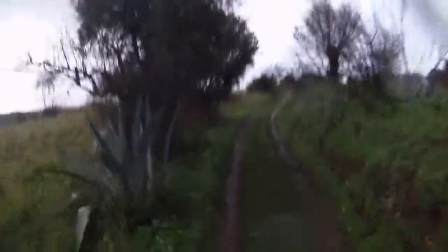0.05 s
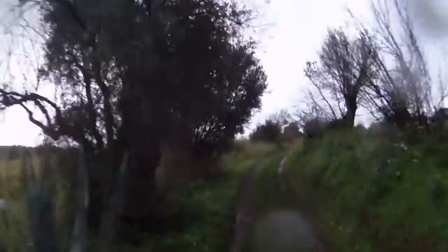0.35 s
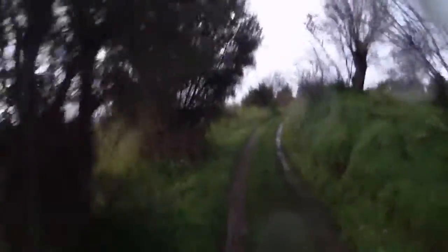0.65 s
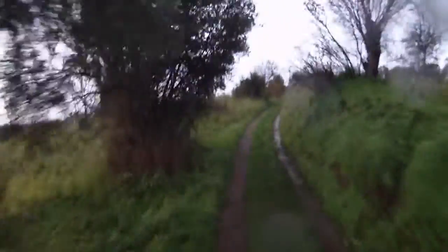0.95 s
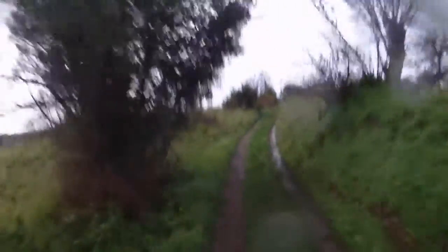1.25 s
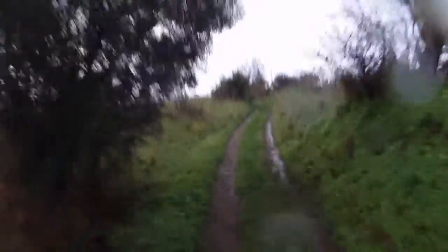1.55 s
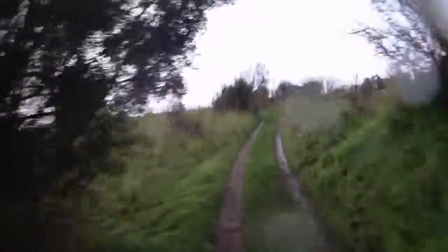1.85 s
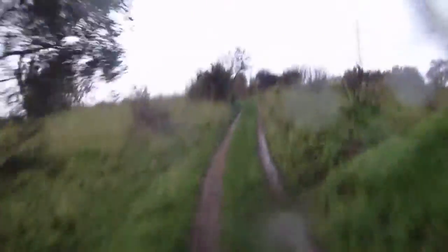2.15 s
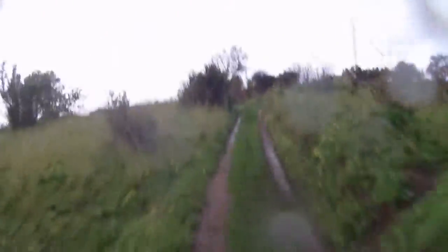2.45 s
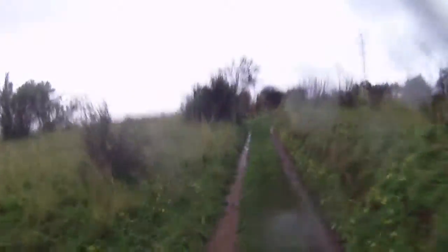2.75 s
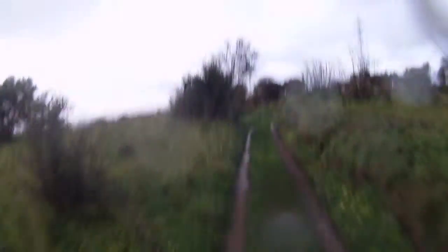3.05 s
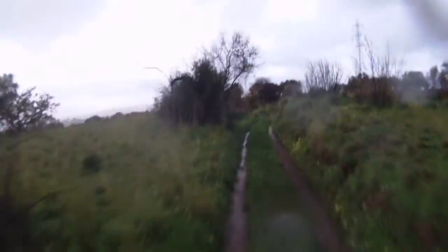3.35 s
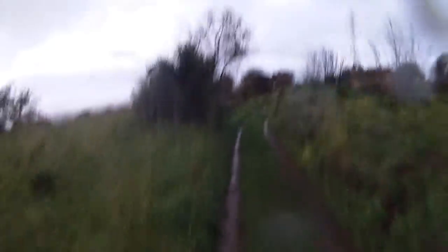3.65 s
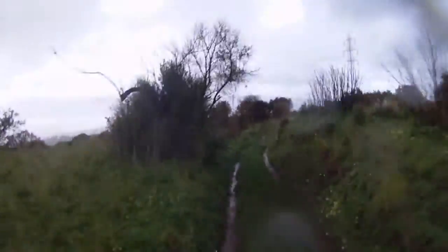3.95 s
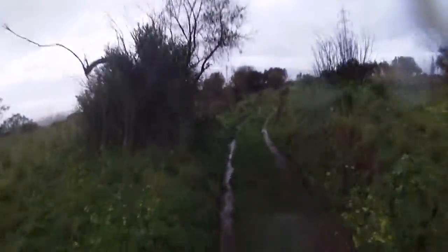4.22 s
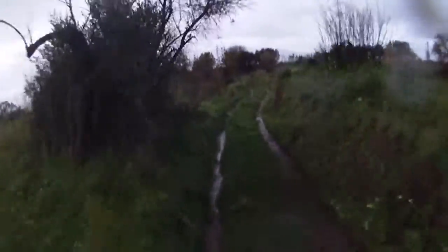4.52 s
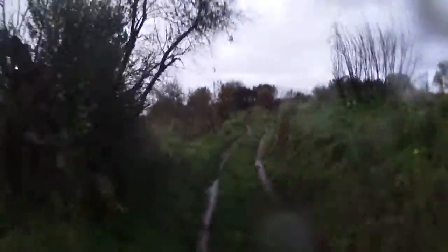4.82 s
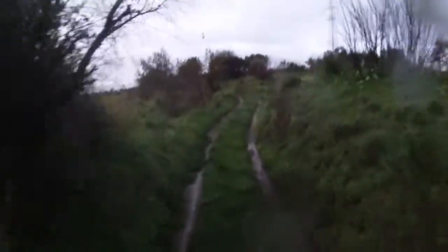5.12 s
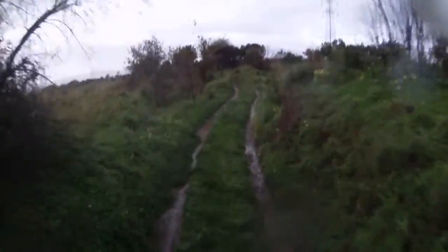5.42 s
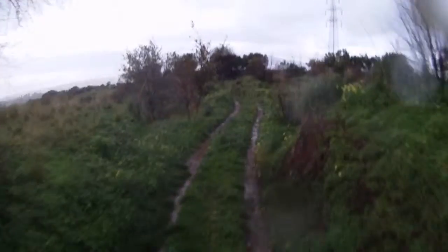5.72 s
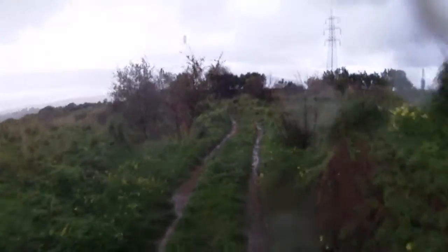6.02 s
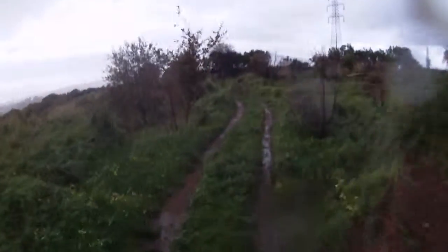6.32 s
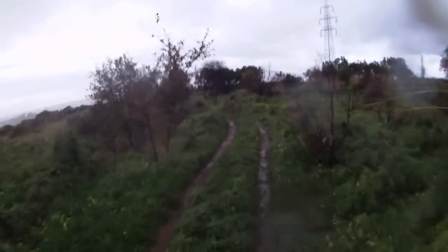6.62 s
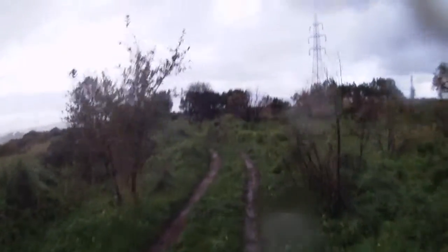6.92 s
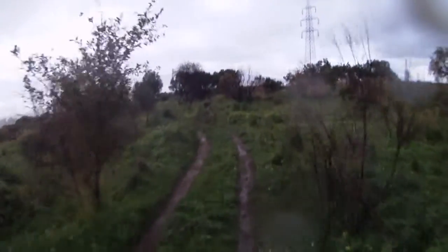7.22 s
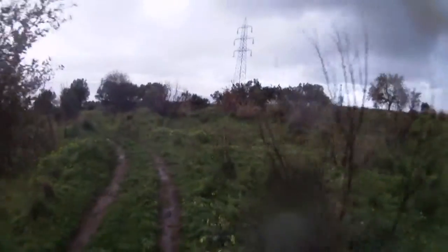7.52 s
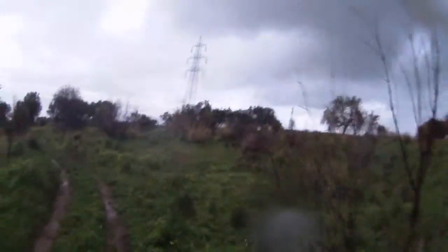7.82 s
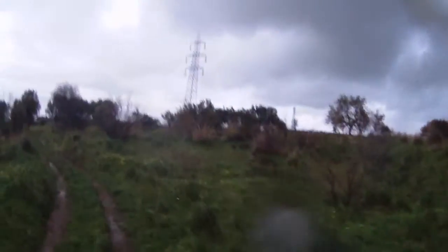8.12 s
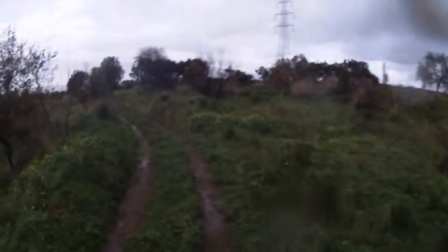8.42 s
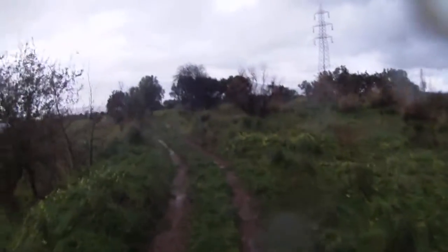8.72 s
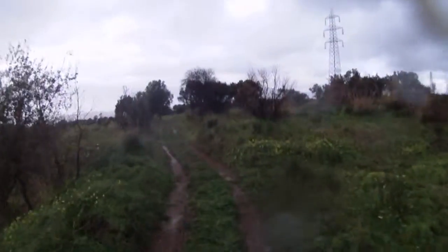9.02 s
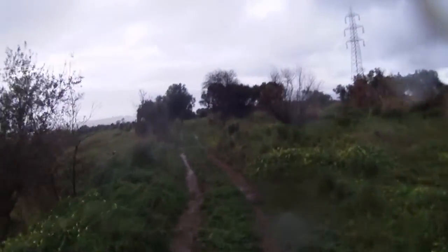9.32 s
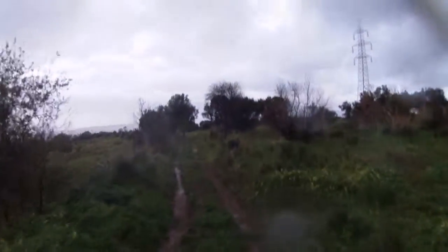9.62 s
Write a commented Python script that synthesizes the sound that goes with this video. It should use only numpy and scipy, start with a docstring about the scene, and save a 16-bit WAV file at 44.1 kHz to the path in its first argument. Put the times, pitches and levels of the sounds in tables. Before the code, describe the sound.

A bumpy outdoor ride on a wet track, heard from inside a closed plastic camera case. It opens with boxy, gusting wind and a loud clatter, over gritty tyre noise, a thin hiss of spray and light rain ticks. The wind falls away a little before halfway, while the tyres keep crackling more softly and the case goes on knocking, rattling and thumping on its mount.

```python
"""A hollow roar of wind comes first, with crunching grit and a few sharp knocks close behind.
A camera in a closed plastic case is riding up a wet dirt track. Wind stirs the air inside the case
and drops after four seconds; tyre grit and small rattles make its shell ring.
Bumps thump through the camera's mount, the case knocks, clatters and gives a few low, soft pops,
fine spray hisses, and raindrops tick on the case."""
import sys
import numpy as np
from scipy import signal
from scipy.fft import rfft, irfft
from scipy.io import wavfile
from scipy.ndimage import uniform_filter1d

SR = 44100
rng = np.random.default_rng(int(sys.argv[2]) if len(sys.argv) > 2 else 0)


def to_wav(sig):
    """Store sig (one row per channel, or 1-D mono) as 16-bit WAV at the path in sys.argv[1].

    Samples outside -1..1 are clipped; the rate is SR.
    """
    pcm = np.clip(np.atleast_2d(sig), -1, 1) * 32767
    pcm = np.round(pcm).astype(np.int16)
    wavfile.write(sys.argv[1], SR, pcm.T)  # frames by channels


N = 434826
HIT = 8192  # samples set aside for one short sound


def undb(db):
    """Turn decibels into a number to multiply by."""
    return 10 ** (np.asarray(db) / 20)


def unit(x):
    """Scale a signal so its average strength (rms) is 1."""
    return x / np.sqrt(np.mean(x ** 2))


def peak(x, db):
    """Scale a signal so its highest peak is at db."""
    return x * undb(db) / np.abs(x).max()


def add(out, s, x):
    """Mix x into out, starting at s seconds."""
    start = int(np.clip(s * SR, 0, N - 1))
    out[start:start + len(x)] += x[:N - start]


def curves(table):
    """Join a table's points in time with straight lines, one curve for each level column."""
    times, *columns = np.transpose(table)
    return [np.interp(np.arange(N) / SR, times, column) for column in columns]


def colour(x, tone):
    """Pass x through an object whose tone is given as rows of f/Hz, level/dB."""
    hz, db = np.transpose(sorted(tone))
    grid_hz = np.maximum(np.arange(HIT // 2 + 1) * SR / HIT, 1)
    gain = undb(np.interp(np.log(grid_hz), np.log(hz), db))
    # put all the ringing after each hit, so its start stays sharp
    cepstrum = irfft(np.log(gain))
    cepstrum[1:HIT // 2] *= 2
    cepstrum[HIT // 2 + 1:] = 0
    ring = irfft(np.exp(rfft(cepstrum)))
    return signal.fftconvolve(x, ring)[:len(x)]


def resonate(x, hz, q):
    """Make x ring at one pitch, using two filters in a row; a higher q rings longer."""
    once = signal.lfilter(*signal.iirpeak(hz, q, fs=SR), x)
    return signal.lfilter(*signal.iirpeak(hz, q / 2, fs=SR), once)


def wander(per_s):
    """A smooth random wobble of strength 1 that picks a new value per_s times a second."""
    hold = int(SR / per_s)
    steps = np.repeat(rng.standard_normal(N // hold + 1), hold)
    return unit(uniform_filter1d(uniform_filter1d(steps, hold), hold // 2)[:N])


def impacts(per_s, spread_db):
    """Taps at random times, most small and a few large."""
    size_db = spread_db * np.minimum(rng.exponential(size=N), 4)
    return (rng.random(N) < per_s / SR) * undb(size_db)


def crackle(per_s, spread_db, decay_s):
    """A loudness curve that jumps at each random tap and then dies away."""
    return unit(signal.lfilter([1], [1, -np.exp(-1 / (decay_s * SR))], impacts(per_s, spread_db)))


def contact(decay_s):
    """One brief, rough touch: a burst of noise that fades."""
    return rng.standard_normal(HIT) * np.exp(-np.arange(HIT) / SR / decay_s)


# How rough and wet the track is: t/s, grit level/dB, spray level/dB
TRACK = [(0, -25, -45), (.45, -25, -40.5), (.68, -27.5, -44), (1.02, -29.5, -50), (1.26, -27, -45.5),
         (1.8, -25.5, -51), (2.25, -29.5, -47.5), (2.52, -32.5, -53), (3.15, -27.5, -53),
         (3.33, -30, -52.5), (3.6, -26.5, -48.5), (4.3, -33.5, -47.5), (4.7, -32, -53.5),
         (5.03, -29.5, -44), (5.22, -36, -53.5), (5.5, -36, -51.5), (5.8, -30, -48), (6.2, -35.5, -51.5),
         (6.8, -35, -55.5), (7.1, -33, -50), (7.9, -36.5, -53.5), (9.15, -32.5, -56.5), (9.34, -41.5, -59),
         (9.58, -31, -54), (9.86, -38, -53)]
def track(patch_db=1.0, patches_per_s=20, halving_s=0.024):
    """Grit and spray levels waver over patches and swell around each bump, knock, pop and clatter."""
    grit_db, hiss_db = curves(TRACK) + patch_db * wander(patches_per_s)
    events = np.zeros(N)
    for s, *_ in TRACK_BUMPS + KNOCKS_AND_POPS + CLATTER_BURSTS:
        add(events, s, np.ones(1))
    swell = signal.windows.hann(2 * int(2 * halving_s * SR) + 1)
    stir = np.clip(signal.fftconvolve(events, swell, "same"), 0, 1)
    return grit_db + 1.5 * stir, hiss_db + 0.36 * stir


# The tone of fine water on the case: f/Hz, level/dB
SPRAY_TONE = [(4000, -40), (8000, -28), (10800, -13), (12300, 3), (12900, 5.5), (13800, 1.5), (14800, 5),
              (15700, -4.5)]
def spray(hiss_db, flicker_db=1.1, boost_db=1):
    """Fine water hisses and spatters over the case."""
    mist = rng.standard_normal(N) * undb(flicker_db * wander(22))
    spatter = 1 + 0.52 * crackle(per_s=45, spread_db=2.7, decay_s=0.0033)
    return unit(colour(mist * spatter, SPRAY_TONE)) * undb(hiss_db + boost_db)


# The biggest raindrops: t/s, peak level/dB before the boost, ring f/Hz
RAINDROPS = [(0.228, -25, 13700), (0.7503, -32, 4300), (0.813, -20, 4900), (1.248, -25, 12500),
             (1.41, -32, 6840), (1.745, -34, 4960), (2.289, -27, 14800), (2.943, -22, 14000),
             (3.5285, -24, 14000), (3.675, -27, 12600), (3.74, -36, 6250), (4.1496, -26, 13300),
             (4.462, -30, 12900), (4.521, -26, 13100), (4.705, -28, 13300), (4.979, -31, 12300),
             (6.151, -32, 4830), (8.199, -30, 14900)]
def raindrops(splash_s=0.00096, boost_db=1):
    """Raindrops tick on the case, each with its own short ring."""
    out = np.zeros(N)
    for s, db, hz in RAINDROPS:
        add(out, s, peak(resonate(contact(splash_s), hz, q=7), db + boost_db))
    return out


def ticks(grit_db, offset_db=-15):
    """Small parts tick against the shell at random, harder on rough ground."""
    taps = impacts(per_s=9, spread_db=5.0)
    return unit(colour(taps, SHELL_TONE)) * undb(grit_db + offset_db)


# The deep tone of the swaying mount: f/Hz, level/dB
SWAY_TONE = [(12, -31), (22, -1.0), (50, -0.5), (70, -11.5), (110, -13.0), (200, -20.5), (400, -47)]
def rocking(grit_db, sway_db=4.0, rise_s=0.017, fall_s=0.11):
    """The mount rumbles on rough ground and keeps swaying after every bump."""
    t = np.arange(N) / SR
    power = undb(-50 + 0.34 * grit_db) ** 2
    for s, _, _, rock_db in TRACK_BUMPS:
        age = np.maximum(t - s, 0)
        power += (undb(rock_db) * (1 - np.exp(-age / rise_s)) * np.exp(-age / fall_s)) ** 2
    sway = rng.standard_normal(N) * undb(sway_db * wander(14))
    return unit(colour(sway, SWAY_TONE)) * np.sqrt(power)


# The low notes the mount rings at: f/Hz, fade time/s (to fall by 60 dB), level/dB
MOUNT_NOTES = [(51, 0.21, -21), (84.4, 0.056, -10.5), (125, 0.038, -11.5), (176, 0.032, -13),
               (234.6, 0.075, -5), (273, 0.051, -12.5), (406, 0.035, 1)]
# The tone of the shuddering case: f/Hz, level/dB
SHUDDER_TONE = [(100, -19), (400, -14), (800, 6.5), (1400, -3.5), (2800, -1.5), (3800, -51), (9000, -39)]
# Bumps, before the boosts: t/s, thump level/dB, shudder level/dB, rocking level/dB
TRACK_BUMPS = [(0.013, -31, -21, -38), (0.283, -33, -36, -48), (0.388, -30, -9.5, -42),
               (0.415, -29.5, -9.5, -47), (0.468, -25.5, -25, -55), (0.758, -34.5, -20, -59),
               (1.338, -35, -23.5, -48), (1.468, -30.5, -19, -49), (1.8, -39, -23, -50),
               (1.985, -36.5, -25, -43), (2.155, -31.5, -33, -49), (2.325, -48, -18, -50),
               (2.833, -28.5, -36, -61), (3.506, -36.5, -38, -45), (3.856, -35.5, -28, -47),
               (3.969, -47, -16.5, -41), (4.075, -36.5, -24, -58), (4.271, -27.5, -21, -43),
               (4.392, -32.5, -25.5, -56), (4.587, -37.5, -41, -58), (4.767, -28, -22, -49),
               (5.25, -36.5, -30, -62), (6.126, -42, -37, -64), (6.398, -41, -30, -56),
               (6.57, -44, -40, -53), (6.652, -41, -34.5, -55), (6.895, -32, -19.5, -55),
               (7.036, -41, -48, -58), (8.816, -31, -24.5, -61), (9.111, -32, -29, -59),
               (9.572, -48, -25, -52)]
def bumps(push_s=0.0028, shudder_s=0.011, thump_delay_s=0.00307, thump_boost_db=3.5, shudder_boost_db=7):
    """Each bump thumps the mount into ringing at its low notes, and the case shudders on it."""
    out, t = np.zeros(N), np.arange(HIT) / SR
    push = 1 - np.exp(-t / push_s)
    for s, thump_db, shudder_db, _ in TRACK_BUMPS:
        ring = np.zeros(HIT)
        for hz, fade_s, note_db in MOUNT_NOTES:
            detuned_hz = hz * (1 + 0.034 * rng.standard_normal())
            phase = 2 * np.pi * (detuned_hz * t + rng.random())
            ring += np.sin(phase) * undb(note_db - 60 * t / fade_s)
        add(out, s + thump_delay_s, peak(ring * push, thump_db + thump_boost_db))
        shudder = colour(contact(shudder_s), SHUDDER_TONE)
        add(out, s, peak(shudder, shudder_db + shudder_boost_db))
    return out


# The tone of the plastic shell: f/Hz, level/dB
SHELL_TONE = [(120, -36), (240, -16.5), (300, -18), (520, -12), (750, -4), (1000, -5), (1500, -6),
              (1950, -3.5), (2350, -4), (2620, 2), (2760, 8.5), (2930, 1), (3100, -5.5), (3900, -27.5),
              (5500, -70), (9000, -100)]
# The shell's high, bright ringing: f/Hz, level/dB
TREBLE_TONE = [(3000, -25), (4100, -8), (4550, -8), (4940, 5), (5270, -1), (5570, 2.5), (5920, -9.5),
               (6300, -1), (6650, -7), (7100, -4.5), (7800, -6.5), (8600, -12.5), (10800, -12.5),
               (16000, -10)]
def tyres(grit_db, hiss_db, shake_db=0.56, grains_db=-1, rattle_db=-1.5):
    """Wet grit crackles under the tyres and shakes small parts into rattling; both ring the shell."""
    shake = undb(shake_db * wander(40))
    rattles = crackle(per_s=80, spread_db=2.5, decay_s=0.0045)
    grains = unit(impacts(per_s=900, spread_db=3.8) * rng.standard_normal(N))
    rattling = (1.1 + undb(rattle_db) * rattles) * rng.standard_normal(N)
    crunch = shake * (undb(grains_db) * grains + rattling)
    fizz = shake * (rng.standard_normal(N) * (1 + 0.55 * rattles) + 0.19 * grains)
    # the bright ringing follows grit and spray about equally
    gap_db = grit_db - hiss_db
    treble_db = hiss_db - 3 + 0.48 * (gap_db - np.mean(gap_db))
    body = unit(colour(crunch, SHELL_TONE)) * undb(grit_db)
    return body + unit(colour(fizz, TREBLE_TONE)) * undb(treble_db)


# Bursts of clatter: t/s, level/dB, length/s, ring f/Hz, treble level/dB before the splash is added
CLATTER_BURSTS = [(0.415, -1, 0.0043, 2450, -16.5), (0.432, -11, .012, 2640, -29),
                  (0.442, -24, 0.011, 2550, -31), (0.501, -30, 0.0087, 2680, -37),
                  (2.18, -28, .005, 2500, -36), (3.168, -13, 0.0037, 2800, -46),
                  (3.962, -25, 0.04, 2420, -47), (4.698, -30, 0.059, 2540, -51),
                  (5.075, -22, 0.0076, 2700, -56), (5.57, -30, 0.015, 2750, -50),
                  (6.903, -29, 0.016, 2720, -62), (7.422, -30, 0.022, 2600, -60),
                  (8.193, -33, .01, 2740, -59), (9.123, -31, 0.012, 2670, -57),
                  (9.573, -28, 0.017, 1600, -55)]
def clatters(splash_db=-2):
    """Hard jolts make the case chatter against its mount and shake water off it."""
    out = np.zeros(N)
    for s, db, length_s, hz, treble_db in CLATTER_BURSTS:
        gate = np.exp(-(2 * np.arange(HIT) / SR / length_s - 1) ** 6)  # on, then off, with soft edges
        chatter = rng.standard_normal(HIT) * gate
        ring = unit(resonate(colour(chatter, SHELL_TONE), hz, q=4))
        splash = undb(splash_db) * unit(colour(chatter, SPRAY_TONE))
        treble = unit(colour(chatter, TREBLE_TONE)) + splash
        length_gain = np.sqrt(np.mean(gate ** 2))  # allows for the silence after the burst
        add(out, s, length_gain * (ring * undb(db) + treble * undb(treble_db)))
    return out


# The loudest knocks and pops: t/s, peak level/dB, ring f/Hz, treble level/dB before the offset
KNOCKS_AND_POPS = [(0.117, -9, 2170, -41), (0.218, -6, 2050, -41), (0.8439, -7, 980, -34),
                   (1.2698, -11, 920, -40), (1.293, -8.5, 2730, -35), (1.5946, -13, 2240, -38),
                   (2.183, -4, 2000, -28), (3.2241, -12, 880, -48), (3.3695, -12.5, 2310, -35),
                   (4.0108, -3.5, 2510, -37), (4.521, -18, 2360, -35), (4.7186, -12, 2380, -45),
                   (5.2132, -20, 2610, -50), (5.9106, -19, 2420, -42), (6.091, -20.5, 2600, -49),
                   (6.151, -15.5, 1890, -38), (6.2963, -20.5, 2110, -38), (6.8989, -9, 1140, -46),
                   (7.17, -12.5, 2370, -35), (7.362, -16, 1280, -47), (7.7323, -21, 2600, -34),
                   (8.1107, -20, 1360, -45), (8.5393, -17.5, 2540, -47), (8.6115, -11, 1450, -46),
                   (8.9437, -11, 2710, -32), (9.014, -9, 2250, -27), (9.396, -20.5, 1540, -40),
                   (9.4685, -17, 2150, -47), (9.5842, -13.5, 1390, -46), (9.65, -20, 1550, -46),
                   (9.8324, -22, 2590, -48)]
def knocks_and_pops(burst_s=0.0014, roughness=0.35, pop_below_hz=1100, treble_offset_db=-3):
    """Sharp knocks ring the shell; low, soft pops, like puffs of wind, sound in the case's hollow."""
    out = np.zeros(N)
    for s, db, hz, treble_db in KNOCKS_AND_POPS:
        push = signal.unit_impulse(HIT) + roughness * contact(burst_s)
        tone = HOLLOW_TONE if hz < pop_below_hz else SHELL_TONE
        ring = resonate(colour(push, tone), hz, q=2)
        add(out, s, peak(ring, db))
        click = colour(contact(burst_s), TREBLE_TONE)
        add(out, s, peak(click, treble_db + treble_offset_db))
    return out


# The tone of the hollow space inside the case: f/Hz, level/dB
HOLLOW_TONE = [(100, -49), (200, -40), (300, -29.5), (500, -12.5), (725, 3.5), (860, -0.5), (1050, -8.5),
               (1450, -15.5), (2200, -23.5), (3000, -62), (5000, -100)]
# The wind, strong for the first four seconds: t/s, level/dB before gusts and boost
WIND_STRENGTH = [(0, -21.5), (.28, -21), (.43, -19), (.68, -19.5), (1.25, -22.5), (1.55, -19), (2, -23.5),
                 (2.6, -26.5), (2.92, -17.5), (3.05, -25), (3.55, -24.5), (4.0, -24.5), (4.1, -32),
                 (4.17, -20), (4.25, -34), (4.35, -25), (4.47, -34.5), (4.95, -35), (5.25, -39.5),
                 (7.1, -40.5), (7.3, -47), (8.35, -45.5), (9.35, -46.5), (9.58, -41.5), (9.7, -43),
                 (9.86, -40)]
def wind(gust_db=0.92, gusts_per_s=14, flutter_db=1.74, buffet_db=1.7, puffs_db=-5, boost_db=0.45):
    """Swirling air and sudden small puffs make the hollow of the case roar."""
    level_db = curves(WIND_STRENGTH)[0] + gust_db * wander(gusts_per_s)
    swirls = unit(rng.standard_normal(N) * undb(flutter_db * wander(130) + buffet_db * wander(25)))
    puffs = unit(impacts(per_s=260, spread_db=2.0) * rng.choice([-1, 1], N))
    roar = colour(swirls + undb(puffs_db) * puffs, HOLLOW_TONE)
    return unit(roar) * undb(level_db + boost_db)


def scene():
    """Everything reaches the one microphone inside the case."""
    grit_db, hiss_db = track()
    water = spray(hiss_db) + raindrops()
    ride = ticks(grit_db) + rocking(grit_db) + bumps() + tyres(grit_db, hiss_db)
    return (water + ride + clatters() + knocks_and_pops() + wind())[None]


def record(dry, ceiling=0.68, top_hz=15800):
    """The camera overloads on the hardest jolt, rounding off its peaks, and cuts the highest treble."""
    rounded = dry / (1 + (dry / ceiling) ** 8) ** (1 / 8)
    return signal.sosfiltfilt(signal.ellip(8, .1, 60, top_hz, fs=SR, output="sos"), rounded)


dry = scene()
out = record(dry)
to_wav(out)
```